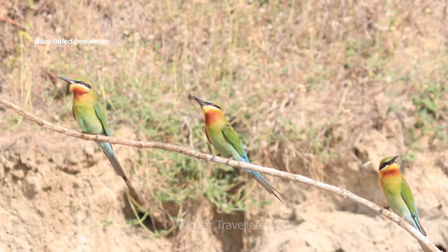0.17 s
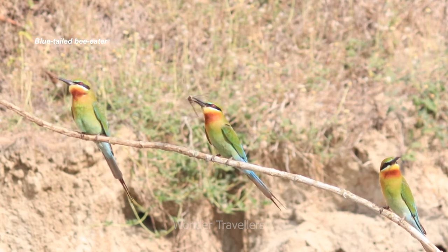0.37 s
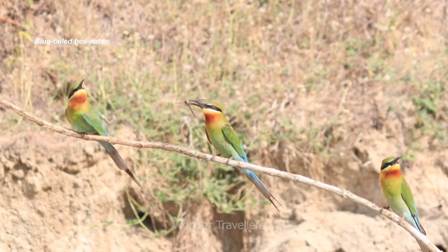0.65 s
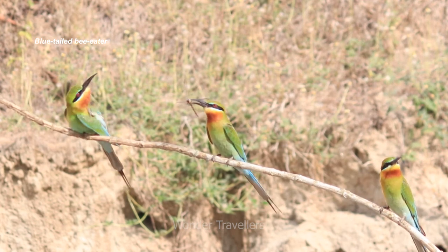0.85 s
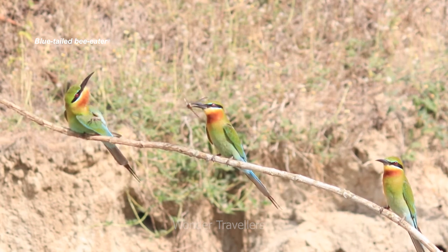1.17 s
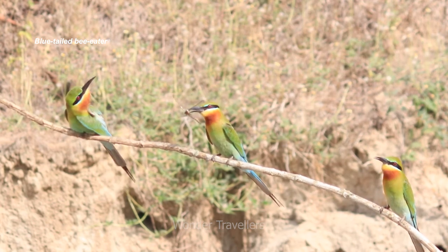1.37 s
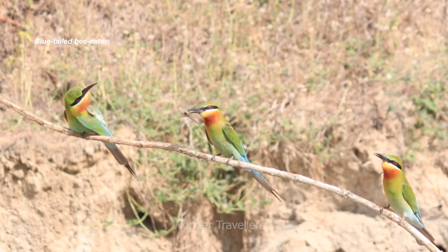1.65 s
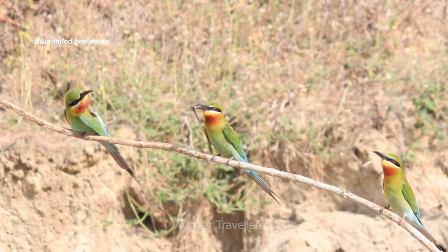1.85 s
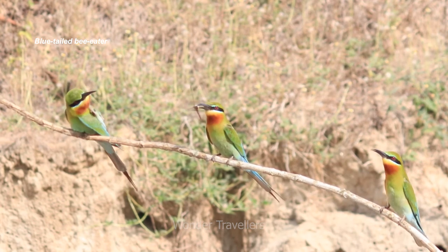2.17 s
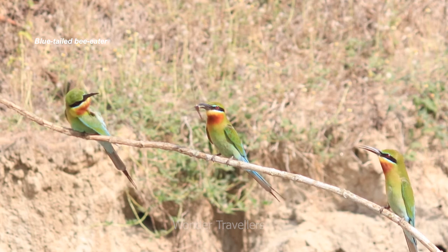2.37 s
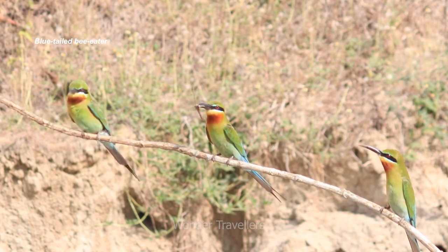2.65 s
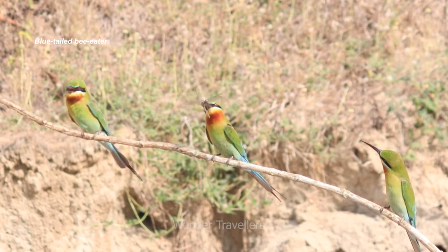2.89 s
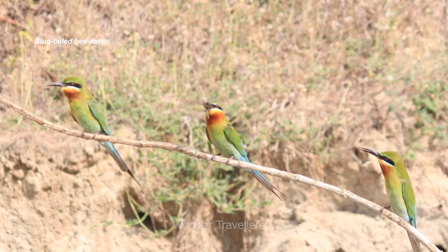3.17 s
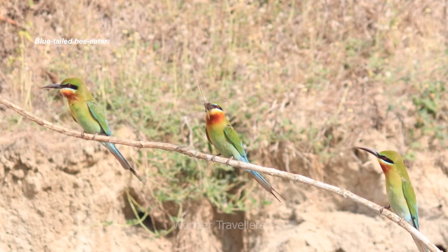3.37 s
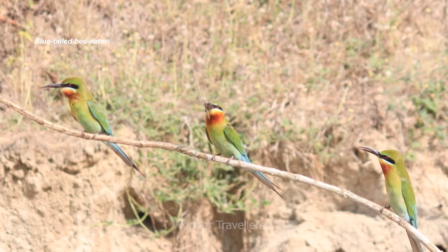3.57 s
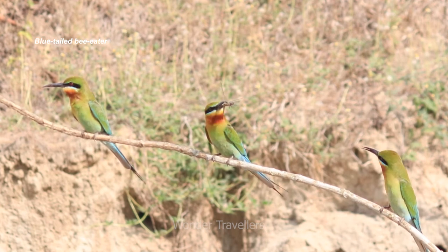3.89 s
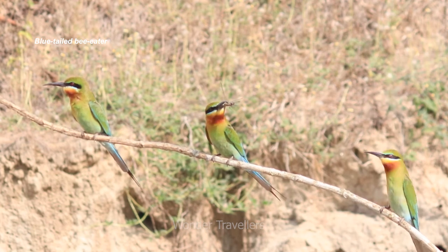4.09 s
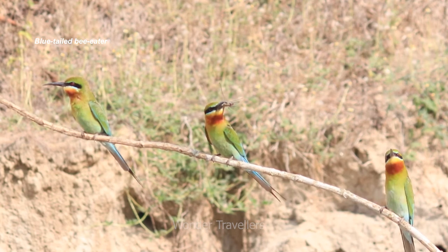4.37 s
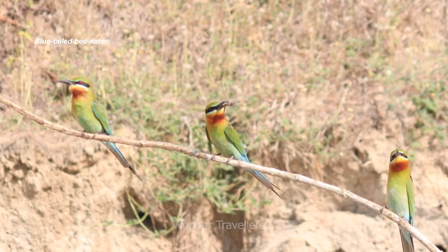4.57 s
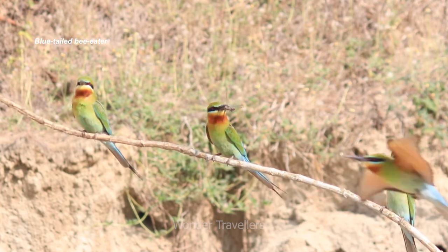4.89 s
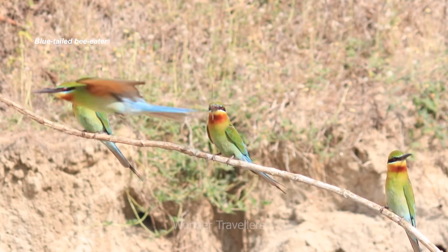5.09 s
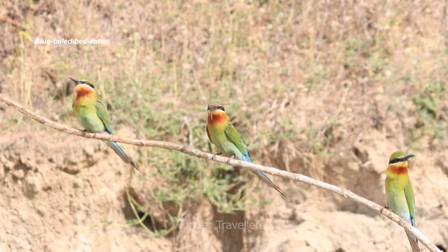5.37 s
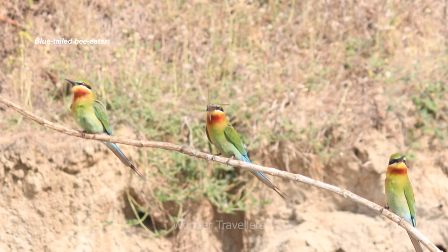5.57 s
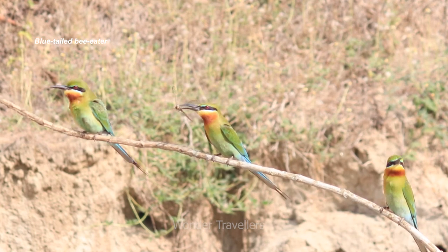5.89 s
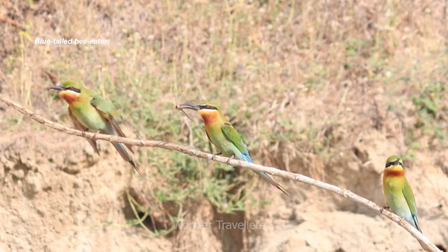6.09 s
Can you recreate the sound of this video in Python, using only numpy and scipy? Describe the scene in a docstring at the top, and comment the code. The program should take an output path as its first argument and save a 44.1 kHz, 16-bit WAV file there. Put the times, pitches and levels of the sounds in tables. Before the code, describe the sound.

Bee-eaters give quick rolling whistled chirps from a branch while several cameras click close by, over soft outdoor hush, low rumble and wind bumps.

```python
"""Bee-eaters call from a branch by a sandy bank: near-pure whistles that keep breaking to a lower register.
Three still cameras click away beside the microphone, each blow a burst of noise plus ringing body tones.
More of the colony is far off, as faint arched notes, with a few dull fluttering cries.
Behind it all are a soft hush, rumble, gusts and bumps of air, and the thuds of a distant engine."""
import sys
import numpy as np
from scipy import signal
from scipy.fft import rfft, irfft, next_fast_len
from scipy.io import wavfile
from scipy.ndimage import uniform_filter1d

SR = 44100
rng = np.random.default_rng(int(sys.argv[2]) if len(sys.argv) > 2 else 0)


def persist_wave(psi):
    """Save psi, clipped to +-1, as 16-bit WAV."""
    counts = np.round(np.clip(psi, -1, 1) * 32767).astype(np.int16)
    wavfile.write(sys.argv[1], SR, np.atleast_2d(counts).T)


N = 275184
TIME = np.arange(N) / SR
# colour of moving air, shared by rumble and gusts: (pitch_hz [Hz], relative_level_db [dB])
WIND = [(15, -26), (45, -3), (80, -0.5), (150, -6.5), (300, -29.5), (700, -39), (3000, -66)]


def amp(db):
    """Turns decibels into a gain."""
    return 10 ** (np.asarray(db) / 20)


def unit(x):
    """Scales a sound to an average strength (rms) of 1."""
    return x / np.sqrt(np.mean(x ** 2) + 1e-20)


def read(points, hz):
    """Reads a curve at hz, with straight lines between its points on a log-frequency axis."""
    point_hz, value = np.transpose(points)
    return np.interp(np.log(hz + 1), np.log(point_hz + 1), value)


def add(mix, s, sound):
    """Adds a sound into the mix at s seconds, cutting off what falls outside."""
    start = round(s * SR)
    sound = sound[max(-start, 0):]
    part = mix[max(start, 0):][:len(sound)]
    part += sound[:len(part)]


def noise(spectrum, size):
    """Random hiss coloured by a spectrum."""
    length = next_fast_len(size + 2048)
    gain = amp(read(spectrum, np.fft.rfftfreq(length, 1 / SR)))
    coloured = irfft(rfft(rng.standard_normal(length)) * gain, length)
    return unit(coloured)[:size]


def waver(rate_hz, size):
    """Random wandering of rms 1, up to about rate_hz: straight lines between random points."""
    steps = np.arange(size) * rate_hz * 2 / SR
    knots = rng.standard_normal(size + 2)
    return unit(np.interp(steps, np.arange(size + 2), knots))


def place(x, lag_ms, balance):
    """A source to the right reaches the left port later, and at another level."""
    hz = np.fft.rfftfreq(N, 1 / SR)
    half_db = read(balance, hz) / 2
    spectrum = rfft(x)
    delay = np.exp(-2j * np.pi * hz * lag_ms / 1000)
    left = spectrum * amp(half_db) * delay
    right = spectrum * amp(-half_db)
    return irfft(np.array([left, right]), N)


def scatter(x, wet_db, t60):
    """Ground, bank and bushes throw back a thin tail that falls 60 dB in t60 s, different at each port."""
    t = np.arange(SR // 2) / SR
    strength = rng.standard_normal((2, len(t)))
    sparse = rng.random((2, len(t))) < .1  # one moment in ten sends an echo
    taps = strength * sparse * amp(-60 * t / t60) * (t > .002)
    taps /= np.linalg.norm(taps, axis=1, keepdims=True)
    return x + amp(wet_db) * signal.oaconvolve(x, taps, axes=1)[:, :N]


def stereo_noise(spectrum):
    """Noise that is alike at both ports in the bass and mostly unrelated in the treble."""
    # how alike left and right are: (pitch_hz [Hz], likeness [0 to 1])
    likeness = [(50, 0.74), (130, 1), (600, 0.62), (1500, 0.06), (3000, 0.04), (6000, 0.064)]
    same = np.clip(read(likeness, np.fft.rfftfreq(N, 1 / SR)), 0, 1)
    shared, left, right = (rfft(noise(spectrum, N)) for _ in range(3))
    return irfft(np.sqrt(same) * shared + np.sqrt(1 - same) * np.array([left, right]), N)


def outdoor_hush(level_db=-53.5):
    """Soft outdoor noise whose level wanders slightly."""
    # colour of the hush: (pitch_hz [Hz], relative_level_db [dB])
    hush_colour = [(100, -8.5), (190, -3.5), (260, -10), (650, -15), (900, -19), (1300, -15), (2800, -17.5),
                   (4500, -29.5), (10000, -32), (15000, -39.5), (16000, -45)]
    return amp(level_db) * stereo_noise(hush_colour) * amp(0.64 * waver(4.9, N))


def rumble(level_db=-51.5):
    """A steady low rumble, made of noise with the colour of wind."""
    return amp(level_db) * stereo_noise(WIND)


def gusts(trim_db=-3, lump_db=3.5):
    """Wind noise that swells and fades, with its own random lumps at each port."""
    # strength of the wind, before the trim and lumps: (time_s [s], level_db [dB])
    strength = [(0.0, -35), (0.4, -63), (0.76, -45), (0.83, -60.5), (4.78, -55.5), (5.14, -39.5),
                (5.35, -47), (6.24, -44)]
    gust_db = np.interp(TIME, *np.transpose(strength)) + trim_db
    return np.array([amp(gust_db + lump_db * waver(12, N)) * noise(WIND, N) for _ in range(2)])


def air_bumps(cycles=0.41):
    """Air bumps against the microphone: each push is a short low swing that dies out on both sides."""
    # the strongest bumps, most of them on one port:
    # (middle_s [s], peak_db [dB], pitch_hz [Hz], left_minus_right_db [dB])
    bumps = [(.005, -20, 197, -12), (.013, -28, 380, -16.5), (.027, -29, 90, -4), (0.0716, -31.5, 240, 10),
             (0.259, -31, 82, -2), (.76, -33, 146, 10), (2.135, -36.5, 124, -15), (3.813, -35, 79.4, 17),
             (4.251, -39.5, 61.2, -19), (4.925, -29, 162, 18), (5.10, -28.5, 100, 3.5),
             (5.134, -34.5, 93, -17), (5.187, -36, 160, -11), (5.535, -33, 86, 14.5),
             (6.217, -33.5, 129, -10)]
    out = np.zeros((2, N))
    t = np.arange(-SR // 20, SR // 20) / SR
    for s, db, hz, pan_db in bumps:
        push = -np.exp(-(t * hz / cycles) ** 2) * np.cos(2 * np.pi * hz * t)
        for port, side in zip(out, (1, -1)):
            add(port, s + t[0], amp(db + side * pan_db / 2) * push)
    return scatter(out, wet_db=-4.5, t60=0.059)


def engine(firing_hz=16, pipe_hz=127, level_db=-57.0, thud_s=0.025):
    """A slow engine far away: each firing is a soft thud in the exhaust pipe, a tone that dies away."""
    out = np.zeros(N)
    t = np.arange(SR // 6) / SR
    thud = (1 - np.exp(-t / 0.0022)) * np.exp(-t / thud_s) * np.sin(2 * np.pi * pipe_hz * t)
    # firings differ a little in timing and strength
    for k, (late, size) in enumerate(rng.standard_normal((110, 2))):
        add(out, k / firing_hz + 0.0011 * late, amp(2.0 * size) * thud)
    return scatter(amp(level_db) * unit(np.array([out, out])), wet_db=-9, t60=0.31)


def far_cry(flutter=0.033, flutter_hz=170):
    """Dull, fluttering tones that scoop up, sag slowly and arrive blurred by echo."""
    # faint drawn-out cries, pitch before scoop and sag:
    # (start_s [s], length_s [s], pitch_hz [Hz], sag [Hz per s], level_db [dB])
    cries = [(2.1, .5, 656, 35, -67.5), (2.744, 0.48, 788, 235.7, -58)]
    scoop, scoop_s = 0.258, 0.0251  # how far below it starts (share of pitch), and how soon it recovers
    fade_share = 0.27  # share of the length spent fading in and out
    out = np.zeros(N)
    for s, length, hz, sag, db in cries:
        t = np.arange(0, length, 1 / SR)
        pitch = (hz - sag * t) * (1 - scoop * np.exp(-t / scoop_s))
        pitch = pitch * (1 + flutter * waver(flutter_hz, len(t)))
        tone = np.sin(2 * np.pi * np.cumsum(pitch) / SR)
        add(out, s, amp(db) * signal.windows.tukey(len(t), fade_share) * tone)
    return scatter(np.array([out, out]), wet_db=4, t60=0.46)


def colony(count=170, spread_db=4, lowest_hz=2150, range_hz=1100):
    """Far birds: faint arched notes, a few clear and many at random, blurred by the bank."""
    # the clearer notes: (start_s [s], pitch_hz [Hz], rise [share of pitch], level_db [dB])
    clear_notes = [(.118, 2900, 0.42, -58), (.52, 2900, .45, -62), (.877, 2310, -.03, -61),
                   (1.858, 2510, -.06, -58), (2.286, 2376, -0.036, -57), (2.70, 2580, -.04, -56),
                   (3.392, 2600, 0.06, -54.5), (3.868, 2334, -0.043, -55), (3.902, 2630, 0.0072, -56),
                   (4.922, 2970, .03, -59), (5.403, 2386, -0.077, -57.5), (5.882, 3095, 0.11, -56)]
    # how lively the random notes are: (time_s [s], level_db [dB])
    liveliness = [(0, -60.5), (1.2, -69.5), (4.4, -68.5), (5.9, -61.5)]
    clear_s, arch = .037, 0.082  # length of a clear note; how far all ends droop, as a share of the pitch
    notes = [(s, clear_s, hz, rise, db) for s, hz, rise, db in clear_notes]
    for k, (late, longer, higher, tilt, louder) in enumerate(rng.random((count, 5))):
        s = (k + late) / count * N / SR
        db = np.interp(s, *np.transpose(liveliness)) + spread_db * (2 * louder - 1)
        notes.append((s, 0.011 + 0.0252 * longer, lowest_hz + range_hz * higher, 0.606 * (tilt - .4), db))

    out = np.zeros(N)
    for s, length, hz, rise, db in notes:
        u = np.linspace(-1, 1, int(length * SR))  # -1 at the start of the note, 1 at its end
        pitch = hz * (1 + rise * u / 2 - arch * u ** 2 + 0.011 * waver(390, len(u)))
        tone = np.sin(2 * np.pi * np.cumsum(pitch) / SR)
        add(out, s, np.sqrt(2) * amp(db) * np.sqrt(1 - u ** 2) * tone)
    return scatter(np.array([out, out]), wet_db=0.0, t60=0.14)


def camera(shots, action, clatter, fall_s, focus_db=6, blur=0.041):
    """Latch, curtain, mirror slap and return: each blow clatters and rings the body's modes near its own pitch."""
    # tones the camera body can ring at: (pitch_hz [Hz], relative_level_db [dB])
    body_modes = [(390, -1.5), (610, 0.5), (1200, 3.5), (1500, -1), (2220, 1), (4450, 1), (7250, 8),
                  (8170, 4.5), (10300, 0.5)]
    out = np.zeros(N)
    for s in shots:
        for offset, length, clatter_db, ring_db, centre_hz in action:
            t = np.arange(0, length + 8 * fall_s, 1 / SR)
            blow = (1 - np.exp(-t / 0.00046)) * np.exp(-np.maximum(t - length, 0) / fall_s)
            ring = np.zeros(len(t))
            for hz, db in body_modes:
                pitch = hz * (1 + blur * waver(503, len(t)))
                octaves_away = abs(np.log2(hz / centre_hz))
                ring += amp(db - focus_db * octaves_away) * np.sin(2 * np.pi * np.cumsum(pitch) / SR)
            # small parts chatter unevenly
            grit = noise(clatter, len(t)) * unit(amp(2.2 * waver(511, len(t))))
            add(out, s + offset, blow * (amp(ring_db) * unit(ring) + amp(clatter_db) * grit))
    return out


def cameras():
    """One camera close by, one firing short bursts, and one with a thin, bright action."""
    # moments of exposure: (time_s [s])
    near_shots = [.7688, 1.4732, 4.699, 4.8042, 6.1895]
    burst_shots = [.298, .3972, 1.005, 1.1053, 4.4358, 4.534, 4.634]
    thin_shots = [2.005, 2.252, 2.499, 2.7455, 2.9925]
    # moving parts of each camera: (from_exposure_s [s], length_s [s], clatter_db [dB], ring_db [dB],
    # centre_hz [Hz], the pitch that the blow rings most)
    near_action = [(-.050, 0.0011, -39, -45, 7400), (-.0418, 0.00042, -33.5, -31.5, 7200),
                   (-.040, 0.0132, -47.5, -96, 7400), (-.0238, 0.0032, -33, -36, 597),
                   (-.020, 0.01, -55, -58, 630), (-.005, 0.0054, -70, -53, 1200),
                   (0, .004, -33.5, -28, 1200), (.005, 0.0283, -45.5, -49.5, 387),
                   (.031, 0.0078, -41.5, -48, 384)]
    burst_action = [(-.038, 0.0011, -52, -44, 7400), (-.032, 0.0022, -55, -73, 7400),
                    (-.021, .002, -48, -42.5, 700), (0, .004, -50, -44, 1200), (.008, .030, -61, -62, 1400)]
    thin_action = [(-.0885, 0.0015, -51, -67, 10300), (-.0425, 0.00086, -47.5, -69, 10300),
                   (-.0248, 0.0016, -48.5, -69, 10300), (-.001, 0.0022, -46, -70, 10300),
                   (.009, .035, -58, -87, 10300), (0.0326, 0.0012, -53, -66, 10300)]
    # colour of the clatter: (pitch_hz [Hz], relative_level_db [dB])
    full_clatter = [(100, -27), (400, 6.5), (900, 1), (1400, 3), (2700, -1), (5000, -0.5), (7800, -1.5),
                    (11000, -11.5), (15500, -19)]
    thin_clatter = [(300, -32), (2500, 7), (5000, -5.5), (8000, -1.5), (12500, -1), (15500, -24)]
    # stereo balance: (pitch_hz [Hz], left_minus_right_db [dB])
    near_balance = [(200, 0), (380, -7), (1290, 0), (2380, 6), (4400, 1), (8100, -10), (15000, 0)]
    side_balance = [(400, 0), (1300, -9), (2400, -11), (8000, -8), (15000, -23)]
    near = place(camera(near_shots, near_action, full_clatter, fall_s=0.0008), 0.086, near_balance)
    burst = place(camera(burst_shots, burst_action, full_clatter, fall_s=0.001), 0.035, side_balance)
    thin = place(camera(thin_shots, thin_action, thin_clatter, fall_s=0.00086), 0.035, side_balance)
    return scatter(near + burst + thin, wet_db=-8, t60=0.046)


def syrinx(hz, level_db, low, boost_db, drop=.645, jitter=0.011, shimmer=0.022, break_rough=0.18,
           edge_s=0.00052):
    """A whistle, loudest where it meets the throat resonance; in a break it falls about a fifth and turns rough."""
    # throat resonance: (pitch_hz [Hz], gain_db [dB])
    throat = [(1700, -17.5), (1950, -11.5), (2200, -10), (2450, -4.5), (2750, -2.5), (3000, -2.5),
              (3300, -21)]
    # overtones before boost and throat: (multiple [times the pitch], relative_level_db [dB])
    overtone_levels = [(2, -30.5), (3, -39), (4, -36.5), (5, -40)]
    size = len(hz)
    low = uniform_filter1d(low.astype(float), size=50)  # smooths the way in and out of a break
    throat_db = (1 - low) * read(throat, hz) + low * read(throat, hz * drop)
    hz = hz * (1 + (drop - 1) * low) * (1 + jitter * (1 + low) * waver(600, size))
    phase = 2 * np.pi * np.cumsum(hz) / SR
    overtones = sum(amp(db + boost_db) * np.cos(round(k) * phase) for k, db in overtone_levels)
    tone = amp(throat_db) * np.cos(phase) + amp(throat_db / 2) * overtones
    # the half-pitch swing of the break leaves a weak tone at 3/2 of the pitch
    tone += amp(-21) * low * np.cos(phase * 3 / 2)
    flutter = 1 + (shimmer + break_rough * low) * waver(500, size)
    edges = signal.windows.tukey(size, min(2 * edge_s * SR / size, 1))
    return np.sqrt(2) * amp(level_db) * tone * flutter * edges


def slur(length, start_hz, end_hz, db, break_s, boost_db):
    """One glide: a rise levels off, a fall runs straight; it may end in a low break that sags and dies away."""
    rise_ease, sag_per_s, fade_db_per_s = 1.8, 1.6, 200  # sag is a share of the pitch
    t = np.arange(0, length + break_s, 1 / SR)
    bend = rise_ease if end_hz > start_hz else 1
    hz = end_hz + (start_hz - end_hz) * np.maximum(1 - t / length, 0) ** bend
    after = np.maximum(t - length, 0)
    return syrinx(hz * (1 - sag_per_s * after), db - fade_db_per_s * after, after > 0, boost_db)


def upslurs():
    """Rising chirps that end in a low break."""
    # (start_s [s], glide_length_s [s], top_hz [Hz], level_db [dB], break_length_s [s])
    chirps = [(2.327, 0.024, 3020, -34, 0.019), (2.394, .025, 3120, -32, 0.012),
              (2.474, .027, 3060, -33, 0.012), (2.585, .030, 2963, -33, 0.0092)]
    out = np.zeros(N)
    for s, length, top_hz, db, break_s in chirps:
        add(out, s, slur(length, 2100, top_hz, db, break_s, boost_db=-0.5))
    return out


def twitter():
    """One hurried run of short glides, each ending in a low break."""
    # (start_s [s], glide_length_s [s], start_hz [Hz], end_hz [Hz], level_db [dB], break_length_s [s])
    glides = [(1.436, 0.021, 2350, 2830, -41, 0.023), (1.459, .010, 3080, 3080, -32.5, 0.012),
              (1.483, .015, 3260, 2410, -36.5, 0.0043), (1.501, 0.0102, 2900, 2310, -37.5, .002),
              (1.513, .010, 2510, 2060, -39, 0.0027)]
    out = np.zeros(N)
    for s, *glide in glides:
        add(out, s, slur(*glide, boost_db=11))
    return out


def reedy_calls():
    """Overtone-rich calls that step up and then down, leading into a phrase."""
    # (start_s [s], level_db [dB], overtone_boost_db [dB] at the start of the call)
    calls = [(1.9177, -38.5, 20), (3.115, -34, 9.5)]
    # glides of one call: (from_call_start_s [s], glide_length_s [s], start_hz [Hz], end_hz [Hz],
    # effort_db [dB], break_length_s [s])
    steps = [(0, 0.031, 2075, 2595, -4, .008), (0.037, .021, 2885, 2006, -1, 0.0016),
             (0.073, .021, 2520, 2320, -3, 0), (.096, .017, 2680, 2610, -1, .002),
             (0.115, .017, 2810, 2140, 1, 0.00029)]
    mellow_db_per_s = 62  # overtones get weaker from glide to glide
    out = np.zeros(N)
    for s, db, boost_db in calls:
        for at, length, start_hz, end_hz, effort_db, break_s in steps:
            glide_boost_db = boost_db - mellow_db_per_s * at
            add(out, s + at, slur(length, start_hz, end_hz, db + effort_db, break_s, glide_boost_db))
    return out


def phrase(stretch, factor, db, stutters):
    """Four arches in one breath; the voice breaks on the climb of each later arch, and stutters in the last."""
    # arches of pitch, before stretch and pitch factor: (length_s [s], top_hz [Hz], end_hz [Hz],
    # crest [share of length], squareness [power], break_from_s [s], break_length_s [s])
    arches = [(.036, 2760, 2380, 0.516, 1.9, 0, 0), (.040, 3070, 1900, .39, 2.2, .005, .009),
              (.030, 2900, 2150, 0.445, 2.0, .006, .005), (.054, 3050, 1980, .52, 3.2, .0153, .0065)]
    from_hz = 2142  # where the first arch starts, before the pitch factor
    stutter_s = .0124  # spacing of the last arch's breaks, before stretch
    swell_db, swell_s = -3, 0.016  # a phrase starts soft and swells
    bright_hz, bright_db_per_hz = 2900, 0.0122  # overtones grow toward the top of each arch
    slack_hz, slack_db_per_hz = 2350, 0.15  # below this pitch, before the factor, the voice loses effort
    hz, low = [], []
    for k, (length, top_hz, end_hz, crest, squareness, break_at, break_s) in enumerate(arches):
        t = np.arange(0, length, 1 / (SR * stretch))
        u = t / length - crest  # negative on the climb, positive on the fall
        climb = (top_hz - from_hz) * abs(u / crest) ** squareness
        fall = (top_hz - end_hz) * abs(u / (1 - crest)) ** squareness
        hz.append(top_hz - np.where(u < 0, climb, fall))
        repeats = round(stutters) if k == len(arches) - 1 else 1
        since = t - break_at
        low.append((since > 0) & (since < repeats * stutter_s) & (since % stutter_s < break_s))
        from_hz = end_hz
    hz, low = np.concatenate(hz), np.concatenate(low)
    swell = swell_db * np.maximum(1 - np.arange(len(hz)) / SR / swell_s, 0)
    slack = -slack_db_per_hz * np.maximum(slack_hz - hz, 0)
    boost_db = bright_db_per_hz * (hz - bright_hz)
    return syrinx(factor * hz, db + np.minimum(swell, slack), low, boost_db)


def rolling_phrases():
    """The main call, given again and again with small changes of pace, pitch and level."""
    # (start_s [s], stretch [times as long], pitch_factor [times], level_db [dB], last_arch_breaks [count])
    phrases = [(1.693, 0.92, 0.96, -36, 2), (2.030, 0.99, 0.96, -34.5, 3), (2.802, 1.015, 1.0, -33.5, 2),
               (3.226, 1.005, 1.01, -34, 3), (3.586, 1.012, 1.0, -34, 3), (3.962, .985, 1.01, -35, 3),
               (4.363, 1.06, 0.98, -36, 3)]
    out = np.zeros(N)
    for s, *delivery in phrases:
        add(out, s, phrase(*delivery))
    return out


def perched_birds():
    """All the calls from the branch, a little to the right, with a thin echo."""
    calls = upslurs() + twitter() + reedy_calls() + rolling_phrases()
    balance = [(2000, -5.0), (2800, -7.5), (9000, -4)]  # (Hz, left minus right dB)
    return scatter(place(calls, 0.022, balance), wet_db=-16.0, t60=0.18)


def scene():
    """Background, cameras and birds together."""
    background = outdoor_hush() + rumble() + gusts() + air_bumps() + engine() + far_cry()
    return background + colony() + cameras() + perched_birds()


def record(dry, whine_db=-76, whine_hz=15708, edge_hz=16000):
    """The electronics add a faint high whine; then a filter cuts the treble above the edge."""
    whine = np.sin(2 * np.pi * whine_hz * TIME)
    low_pass = signal.firwin(511, edge_hz, window=("kaiser", 9), fs=SR)
    return signal.oaconvolve(dry + amp(whine_db) * whine, low_pass[None], "same")


dry = scene()
out = record(dry)
persist_wave(out)
```